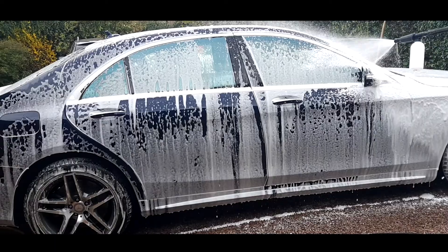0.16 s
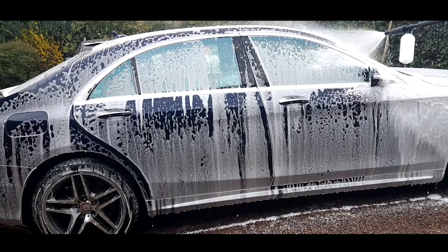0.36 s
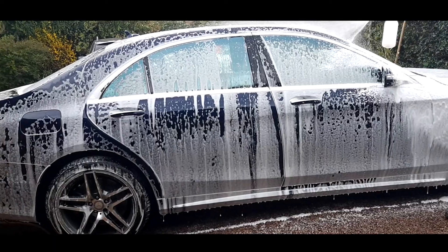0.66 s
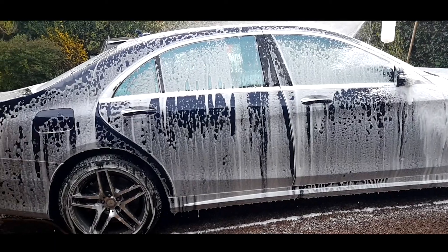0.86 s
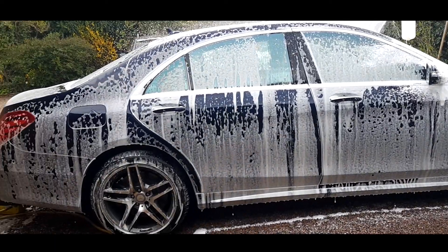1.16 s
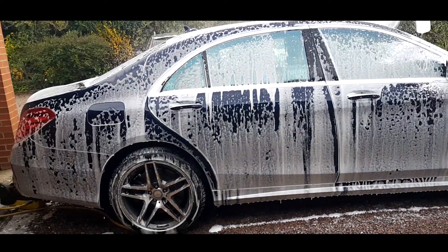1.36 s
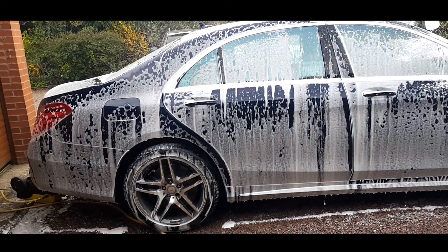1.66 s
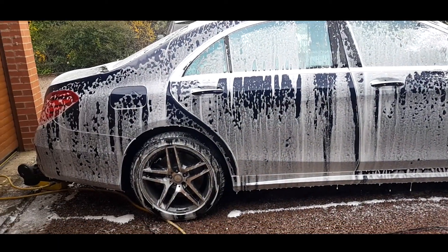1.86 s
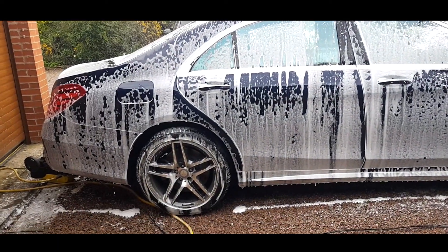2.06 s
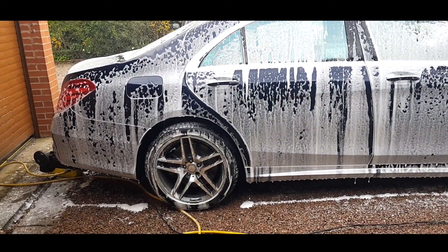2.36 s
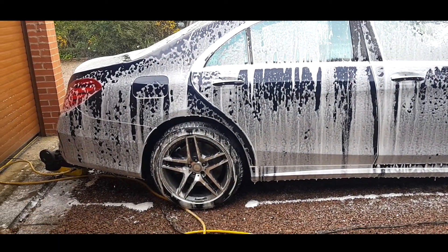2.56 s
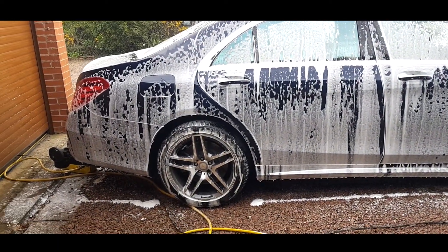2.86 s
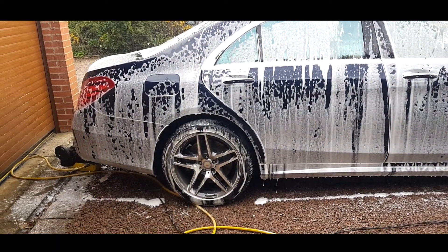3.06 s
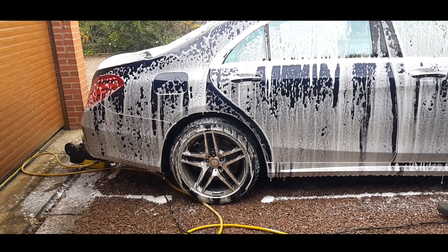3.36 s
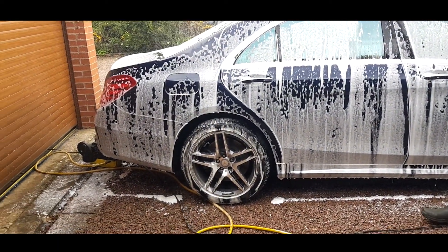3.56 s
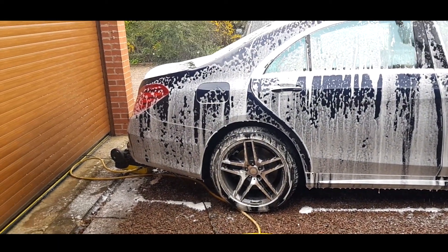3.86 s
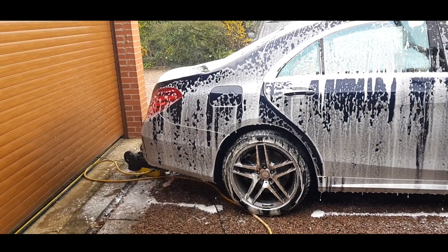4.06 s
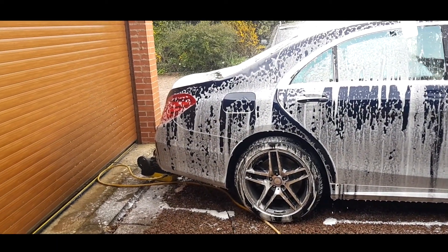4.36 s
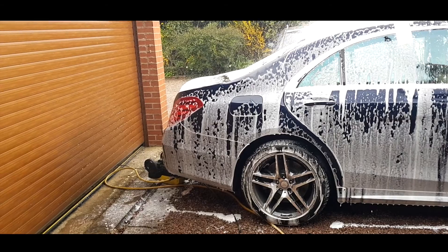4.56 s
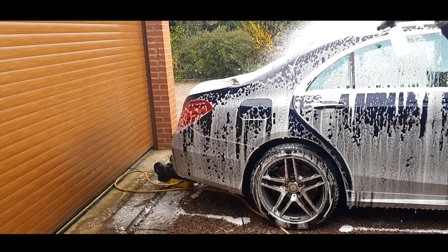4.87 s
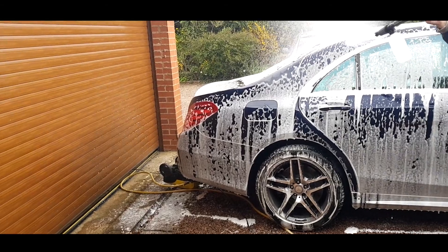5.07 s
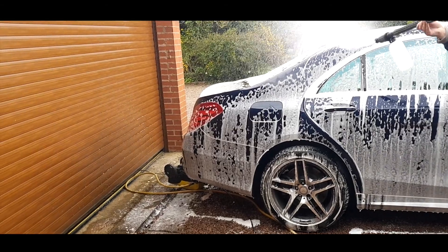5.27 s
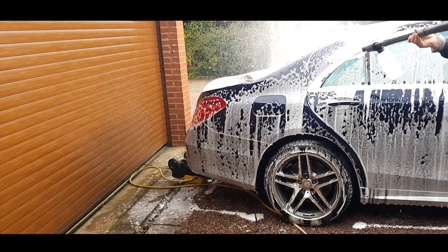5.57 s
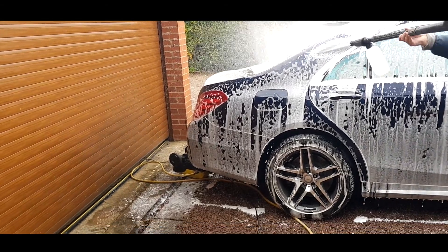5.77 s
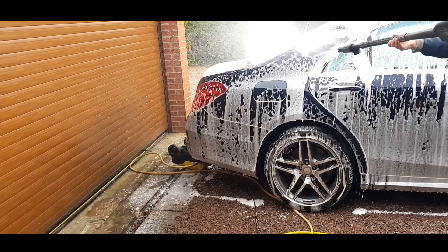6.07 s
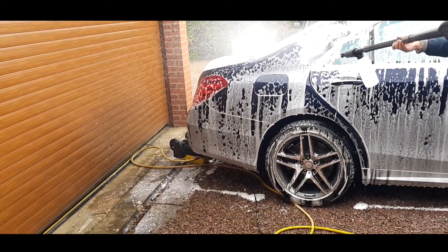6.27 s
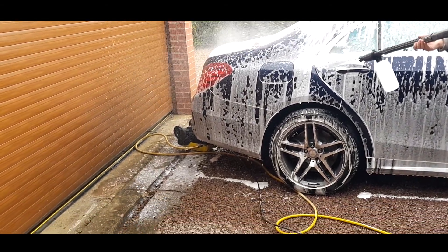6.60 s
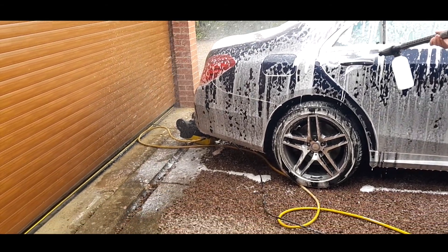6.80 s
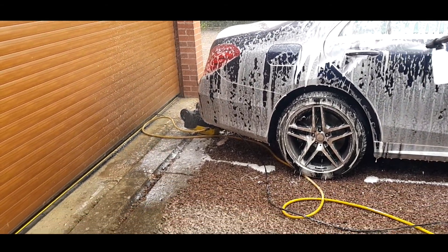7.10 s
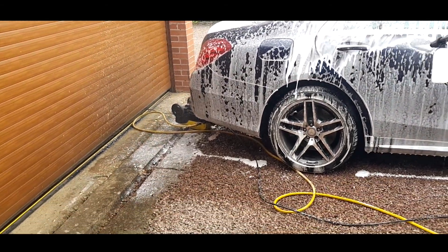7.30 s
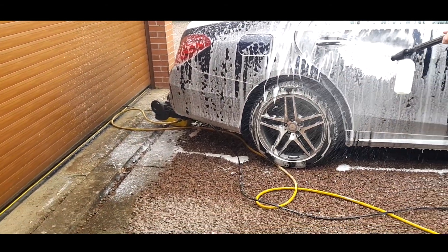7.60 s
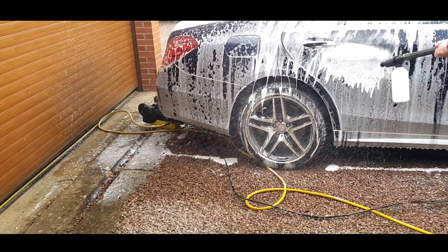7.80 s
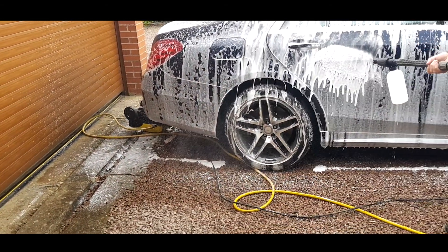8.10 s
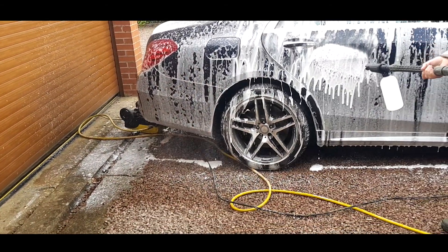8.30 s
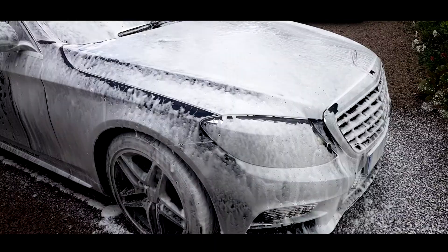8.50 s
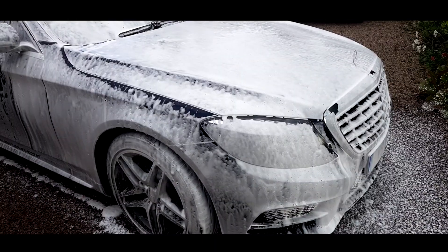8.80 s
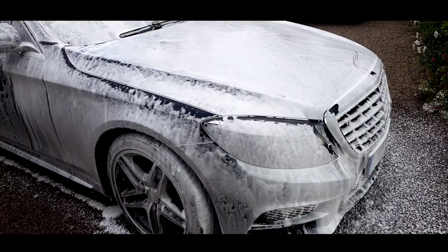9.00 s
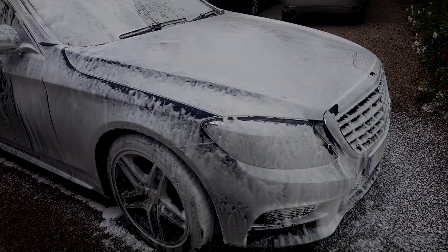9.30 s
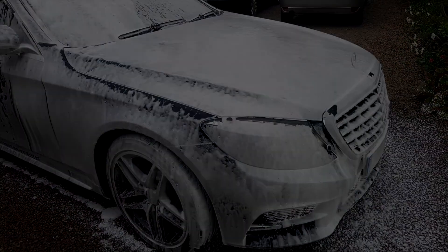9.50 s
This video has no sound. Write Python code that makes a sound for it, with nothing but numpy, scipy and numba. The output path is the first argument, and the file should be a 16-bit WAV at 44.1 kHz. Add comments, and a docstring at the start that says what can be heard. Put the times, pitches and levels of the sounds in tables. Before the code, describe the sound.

A clipped burst of pump buzz and clatter, then brief silence. A pressure washer fades in, its electric hum under a rushing jet, wind thumping the microphone. The hiss grows bright and close, foam pattering on panels, until the trigger snaps, the motor runs down and small knocks follow. Silence, then faint outdoor air.

```python
"""On a driveway, a pressure washer foams a car: orders of the shaft speed hum as the pump, filtered noise roars
and hisses as the lance and its spray, random impacts patter as foam on the panels.
The trigger snaps shut, the motor runs down and a few knocks follow, while low noise buffets the microphone as wind.
The sound comes in three stretches with silence between; the last holds only distant outdoor noise, faint chirps,
a short wet rustle and a low drone, besides one quiet tick."""
import sys
import numpy as np
from scipy import signal
from scipy.fft import rfft, irfft, next_fast_len
from scipy.io import wavfile
from scipy.ndimage import uniform_filter1d, map_coordinates
from numba import njit

SR = 44100
rng = np.random.default_rng(int(sys.argv[2]) if len(sys.argv) > 2 else 0)


def bounce(signal):
    """Save signal as a 16-bit WAV file at the path given by the first command-line argument."""
    frames = np.transpose(np.atleast_2d(signal))
    limited = np.clip(frames, -1, 1)
    pcm = np.round(limited * 32767).astype(np.int16)
    wavfile.write(sys.argv[1], SR, pcm)


N = 425565
T = np.arange(N) / SR  # s
TOP_HZ = 15900  # nothing much is heard above this

# Levels in the tables are those before the trims, wavers and pans set in the functions.
# Colours are spectra: their levels shape a sound, whose loudness is set elsewhere.

# Stretches of sound. Each row: start in seconds, end in seconds, fade-in in seconds.
STRETCHES = [(0, .101, .002), (.381, 8.43, .2), (8.785, 9.66, .3)]

# Pump hum, a list for each run. Each row: time in seconds, level in dB.
HUM_LEVEL = [
    [(0, -35.5), (.1, -60)],
    [(.39, -43.5), (.75, -39), (2.2, -37.5), (3.4, -33), (4.5, -34.5), (5.4, -37.5), (6.9, -36.5),
     (7.72, -36)],
]
# Tones of the pump. Each row: multiple of the shaft speed, level in dB.
PUMP_ORDERS = [(3, -16), (4, -22), (5, -12.5), (6, -10), (7, -14.5), (8, -31), (9, -19), (10, -32.5),
               (11, -7), (12, -10), (13, 0), (14, -3), (15, -15), (16, -12), (17, -11.5), (18, -17.5),
               (19, -29), (20, -24.5), (21, -20.5), (22, -25), (23, -17), (24, -12.5), (25, -16),
               (26, -13.5), (27, -18.5)]
# Steady tones in the hum that do not follow the shaft. Each row: pitch in Hz, level in dB.
MAINS_TONES = [(199.3, -17.5), (600, -19.5)]
# Low pump tones, mostly fading as the microphone moves round the car. Each row: time in seconds, gain in dB.
BOOM_GAIN = [(0, 9.5), (.6, 4), (1.3, 4.5), (2.2, -1.5), (3.3, 0), (4.3, -2.5), (5.3, -1), (6.5, -5),
             (7.6, -2)]
# Colour of the rattling pump housing. Each row: frequency in Hz, level in dB.
HOUSING_COLOUR = [(100, -22), (180, -13), (320, -7.5), (410, -18), (510, 0.5), (620, 0), (760, -9),
                  (1000, -17.5), (1300, -13.5), (2500, -20.5), (5000, -32.5)]
# Shaft speed in the long stretch, and in the short first one
SHAFT_HZ, FIRST_SHAFT_HZ = 48.17, 49.8
# The trigger shuts, the loaded motor sags, then it is cut and runs down
SHUT_S, CUT_OUT_S = 7.640, 7.724
STALL_SAG_HZ, STALL_S, RUN_DOWN_HZ_PER_S = 0.82, .03, 32

# Broad rush of the jet, a list for each run. Each row: time in seconds, level in dB.
RUSH_LEVEL = [
    [(0, -46.5), (.1, -52)],
    [(.39, -34), (.8, -31.5), (1.2, -34), (2.6, -32.5), (3.3, -29.5), (4.7, -32), (5, -33), (6.1, -32),
     (7.6, -31)],
]
# Lower resonance of the roar, a list for each run. Each row: time in seconds, level in dB.
LOW_ROAR_LEVEL = [
    [(0, -58.5), (.1, -53)],
    [(.39, -47), (.85, -31), (1.1, -40.5), (1.7, -35), (2.4, -39.5), (2.81, -29.5), (3.4, -29), (3.83, -33),
     (4.75, -27.5), (5.0, -35.5), (5.2, -31.5), (6.1, -30), (6.3, -43.5), (6.6, -31), (6.96, -35),
     (7.63, -40.5)],
]
# Upper resonance of the roar, a list for each run. Each row: time in seconds, level in dB.
HIGH_ROAR_LEVEL = [
    [(0, -44.5), (.1, -57)],
    [(.39, -39), (.65, -33.5), (.9, -39), (1.3, -38), (2.2, -46), (2.6, -37.5), (3.5, -33), (4, -31),
     (4.8, -28), (5.1, -31.5), (5.5, -28), (6.1, -29.5), (6.4, -27), (6.8, -34.5), (7.4, -32), (7.63, -44)],
]
# Resonances as the lance is swung. Each row: time in seconds, lower centre in Hz, upper centre in Hz.
LANCE_AIM = [(.42, 1898, 1904), (.62, 1800, 2155), (.85, 1560, 1980), (1.3, 1650, 2130), (1.75, 1502, 2083),
             (2.3, 1700, 2220), (2.85, 1876, 2410), (3.3, 1710, 2350), (4.3, 1787, 2360),
             (4.85, 1870, 2458), (5.15, 1806, 2390), (5.55, 1770, 2440), (6.1, 1860, 2290),
             (6.45, 1780, 2370), (6.9, 1760, 2330), (7.6, 1800, 2405)]
# Colour of the broad rush. Each row: frequency in Hz, level in dB.
RUSH_COLOUR = [(500, -16), (800, -7), (1000, -7.5), (1250, -0.5), (1420, -4), (1650, 1), (2100, 1.5),
               (2700, -2.5), (3000, -9.5), (4000, -14.5), (6000, -31.5)]
# The nozzle whistles as it points past the microphone. Each row: middle in seconds, length in seconds, level in dB.
WHISTLES = [(5.18, 0.52, -27.5), (5.6, 0.27, -27.5), (6.05, 0.26, -39), (6.8, 0.59, -29),
            (7.18, 0.4, -24.5), (7.38, 0.13, -27)]
# Pitch of the whistle. Each row: time in seconds, centre in Hz.
WHISTLE_PITCH = [(5.1, 3230), (5.55, 3380), (6.1, 3300), (6.8, 3240), (7.4, 3330)]

# Hiss of the spray, a list for each run. Each row: time in seconds, level in dB.
HISS_LEVEL = [
    [(0, -43), (.02, -45), (.035, -55.5), (.06, -50), (.075, -46), (.1, -62)],
    [(.39, -44.5), (.65, -44), (1.24, -43.5), (2.15, -46.5), (2.8, -36.5), (3.68, -33), (3.78, -29.5),
     (3.88, -28.5), (4.02, -27), (4.13, -27), (4.5, -26.5), (4.78, -25.5), (4.88, -22.5), (5.06, -22.5),
     (5.19, -23.5), (5.25, -26), (5.33, -24), (5.39, -22.5), (5.48, -21.5), (5.56, -29), (5.67, -24.5),
     (5.76, -29), (5.94, -29), (6.0, -30), (6.12, -30.5), (6.22, -25.5), (6.35, -30.5), (6.45, -29.5),
     (6.58, -28), (6.8, -25.5), (7.0, -26), (7.29, -26), (7.4, -21.5), (7.56, -33.5), (7.64, -30)],
]
# Hiss from close by. Each row: frequency in Hz, level in dB.
NEAR_HISS_COLOUR = [(1500, -19), (2800, -3.5), (3950, -1.5), (4500, -20), (5200, -7), (6200, 1.5),
                    (6900, -1.5), (8000, 5.5), (9000, -4), (10200, -0.5), (11200, -7.5), (12600, -5.5),
                    (14000, -12), (16000, -17.5)]
# Hiss from the far end of the car. Each row: frequency in Hz, level in dB.
FAR_HISS_COLOUR = [(1500, -23), (3000, 0.5), (3750, -13.5), (4300, 1), (4750, -2), (5350, 4.5), (6100, -4),
                   (7200, -2.5), (8000, 3.5), (9000, 0), (10300, 0), (11300, -2), (12500, 4), (15500, -6.5)]
# The fan clears the roof and comes into view. Each row: time in seconds, share heard from close by (0 to 1).
IN_VIEW = [(3.66, 0), (3.76, .6), (4.8, 1)]
# Top of the hiss against the rest as the fan changes its angle. Each row: time in seconds, gain in dB.
TOP_HISS_GAIN = [(.5, -4), (2.2, -14), (3.0, -2), (4.2, -1), (4.9, -2.5), (5.45, 0), (5.7, 6.5), (6.4, 2),
                 (7.15, -6), (7.4, -1), (7.55, 11.5)]

# Steady breeze on the microphone. Each row: time in seconds, level in dB.
BREEZE_LEVEL = [(0, -44.5), (1.0, -45), (1.7, -39.5), (3.4, -38), (4.2, -44.5), (5.1, -52), (6, -47.5),
                (7.5, -44), (7.85, -51.5), (8.42, -62.5)]
# Gusts thumping the microphone. Each row: middle in seconds, length in seconds, level in dB before length scaling.
GUSTS = [(0.572, 0.062, -24.5), (0.643, .05, -27), (0.722, 0.19, -33), (1.187, .04, -34), (1.26, 0.11, -36),
         (1.496, 0.03, -25), (1.62, 0.04, -33), (1.69, 0.018, -28), (1.764, 0.078, -28),
         (1.844, 0.045, -29), (1.901, 0.046, -31), (2.078, 0.045, -31), (2.145, 0.044, -32),
         (2.208, .05, -28), (2.267, .03, -36), (2.331, 0.024, -29), (2.382, 0.037, -28), (2.51, 0.25, -28),
         (2.64, .05, -30), (2.721, .035, -24), (2.884, 0.048, -31), (2.963, 0.027, -34),
         (3.167, 0.063, -36), (3.273, 0.043, -33), (3.346, .05, -29.5), (3.625, 0.044, -37),
         (3.857, 0.05, -31), (3.95, .05, -37), (4.035, 0.061, -30), (4.455, 0.033, -34.5),
         (4.629, 0.085, -34.5), (4.8, 0.17, -33), (5.38, 0.087, -42), (6.269, 0.067, -33),
         (6.337, .05, -31), (6.435, 0.073, -31), (6.61, .04, -37), (6.773, 0.052, -32.5),
         (7.17, 0.047, -35), (7.251, 0.044, -34), (7.419, .04, -39.5), (7.528, 0.035, -37),
         (7.763, 0.033, -39), (7.851, .02, -48), (7.907, 0.033, -45), (7.975, 0.035, -44.5),
         (7.999, 0.021, -41), (8.056, .025, -47), (8.152, 0.037, -43), (8.201, 0.029, -35),
         (8.277, 0.037, -42), (8.322, 0.032, -47)]
# Colour of the wind at the microphone. Each row: frequency in Hz, level in dB.
WIND_COLOUR = [(15, -30.5), (35, -4.5), (62, 3), (100, -1), (150, -10), (220, -18), (400, -31), (1200, -64),
               (16000, -140)]

# Distant outdoor noise, a list for each stretch. Each row: time in seconds, level in dB.
AIR_LEVEL = [
    [(0, -37.5), (.1, -59)],
    [(.39, -45.5), (7.8, -65), (8.2, -70), (8.43, -77)],
    [(8.79, -54), (9.2, -49), (9.65, -55.5)],
]
# Colour of the distant noise. Each row: frequency in Hz, level in dB.
AIR_COLOUR = [(25, -16.5), (55, -4), (110, -5), (150, -10), (270, -10), (380, -14.5), (700, -16),
              (1200, -15), (1700, -20.5), (2500, -24.5), (3500, -30.5), (5200, -37.5), (7500, -35),
              (15500, -51)]

# Knocks and ticks. Each row: start in seconds, level in dB, time to fall 60 dB in seconds,
# tilt in dB per octave, ring in Hz.
KNOCKS = [(.012, -29.5, 0.12, -3, 600), (.031, -32, 0.05, -3, 2350), (0.042, -30, 0.18, -8, 189),
          (.066, -43, .04, -2, 2000), (.086, -35, 0.036, -2, 1910), (.655, -33.5, 0.18, -0.5, 800),
          (1.695, -29.5, 0.21, -1, 590), (4.233, -41, 0.11, -6, 600), (4.659, -23, .1, 2, 700),
          (4.752, -11, .012, 3, 2510), (7.811, -50, 0.063, 3, 1500), (7.862, -47, 0.087, -1, 2600),
          (7.872, -42.5, .11, -3.5, 600), (7.973, -58, .05, -4, 2400), (8.03, -62, .05, -3, 1100),
          (8.054, -61, .04, -3, 2800), (8.071, -54, .03, 0, 1000), (8.102, -54, 0.054, -4, 900),
          (8.133, -49, 0.046, -8, 840), (8.17, -63, .04, -3, 3000), (8.206, -50, .045, 3, 2090),
          (8.237, -54, 0.043, -8, 1800), (8.253, -35.5, 0.035, 1, 680), (8.263, -53, 0.066, 0, 650),
          (8.28, -56, .04, 2, 600), (8.418, -52.5, 0.014, 2.5, 2400), (8.839, -41.5, .03, -1.5, 2500)]
# Colour of their clatter before the tilt. Each row: frequency in Hz, level in dB.
KNOCK_COLOUR = [(100, -15.5), (250, 1.5), (800, 0), (1400, -12), (2500, -6.5), (5000, -25.5), (8500, -6.5),
                (15000, -21.5)]
# Big drops on glass and paint. Each row: start in seconds, level in dB.
SPITS = [(.068, -42), (3.766, -16), (3.989, -13.5), (4.851, -8), (4.986, -15), (4.992, -15), (5.075, -12),
         (5.085, -15.5), (5.215, -8), (5.383, -6), (5.415, -12), (5.496, -21), (6.103, -27), (7.447, -17)]
# Dull footfalls. Each row: start in seconds, level in dB, ring in Hz.
THUDS = [(1.268, -31, 192), (1.695, -38, 208), (2.471, -26, 179), (2.521, -29, 213), (4.235, -39, 345),
         (4.658, -29, 288), (4.678, -28, 330), (4.775, -31, 150)]

# Foam splashing on the near panels. Each row: time in seconds, level in dB.
SPLASH_LEVEL = [(3.6, -55), (3.74, -36), (4.3, -32.5), (4.85, -29), (5.3, -36), (5.65, -28), (6.1, -28),
                (6.3, -28.5), (6.55, -31), (6.8, -29.5), (7.15, -28.5), (7.42, -28.5), (7.53, -45),
                (7.63, -32)]
# Colour of the splashing. Each row: frequency in Hz, level in dB.
SPLASH_COLOUR = [(1900, -23.5), (2550, -0.5), (2800, 0), (3080, -1), (3380, 1), (3700, -8.5), (3950, 0),
                 (4200, -8), (4450, -6), (4750, -5), (6500, -23)]

# Modes of the trigger valve. Each row: pitch in Hz, level in dB, time to fall 60 dB in seconds.
VALVE_MODES = [(1136, -3.5, 0.081), (1350, -0.5, 0.034), (1413, -3.5, 0.062), (1760, 3, 0.038),
               (1810, -5.5, 0.029), (1960, 1.5, 0.061), (2640, -1.5, 0.035), (3760, 3, 0.032),
               (3900, 4.5, 0.016), (4130, 3, 0.04), (8200, 11, 0.012), (10230, -2, .012)]
# Crack of the valve. Each row: frequency in Hz, level in dB.
CRACK_COLOUR = [(200, -12), (500, -9), (1000, -2), (1700, -1), (2800, 0.5), (3900, 3), (5200, -18.5),
                (6500, -18.5), (8200, -4), (11000, -6.5), (15500, -13)]

# Scuffs on the wet ground. Each row: middle in seconds, length in seconds, level in dB.
SCUFFS = [(8.055, 0.062, -56), (8.115, 0.093, -63), (8.23, 0.14, -61.5)]
# Colour of the scuffs. Each row: frequency in Hz, level in dB.
SCUFF_COLOUR = [(250, -17), (550, 2), (950, 0), (1400, -19), (2300, -13), (4500, -19), (8000, -17),
                (15000, -16)]
# Faint chirps. Each row: middle in seconds, length in seconds, level in dB, pitch at the middle in Hz,
# glide in Hz per second.
CHIRPS = [(9.034, 0.066, -56, 2610, 0), (9.252, 0.034, -59, 2170, -9000), (9.49, .1, -72, 2970, -5000)]
# Wet rustles. Each row: middle in seconds, length in seconds, level in dB.
RUSTLES = [(9.078, 0.034, -50), (9.14, 0.13, -49.5), (9.25, 0.048, -55), (9.31, 0.094, -54.5)]
# Low drone at the very end. Each row: pitch in Hz, level in dB.
DRONE_TONES = [(108.5, -50), (222, -56), (276, -69)]


def undb(db):
    """Decibels to gain."""
    return 10 ** (np.asarray(db) / 20)


def unit(x):
    """Scale to rms 1."""
    return x / np.sqrt(np.mean(x ** 2))


def decay(t, t60):
    """Exponential fall of 60 dB in t60 seconds."""
    return np.exp(-np.log(1000) * t / t60)


def curve(rows, column=1):
    """One column of a table, joined by straight lines in time."""
    rows = np.array(rows)
    return np.interp(T, rows[:, 0], rows[:, column])


def swell(runs, t60=0.064):
    """Gain from the levels of several runs; each run dies away after its last row."""
    gain = 0
    for rows in runs:
        after = np.clip((T - rows[-1][0]) / t60, 0, 2)
        gain = gain + (T >= rows[0][0]) * undb(curve(rows)) * decay(after, 1)
    return gain


def bumps(rows):
    """Gain of separate sounds, each rising and falling smoothly about its middle."""
    gain = 0
    for middle_s, length_s, db in rows:
        gain = gain + undb(db) * np.cos(np.pi * np.clip((T - middle_s) / length_s, -.5, .5))
    return gain


def colour(x, points, tilt_db=0):
    """Filter by a (Hz, dB) spectrum and a tilt per octave; rms 1."""
    hz, db = np.transpose(points)
    size = next_fast_len(x.shape[-1], True)
    octave = np.log2(np.maximum(np.arange(size // 2 + 1) * SR / size, 1))
    tilt = tilt_db * np.clip(octave, np.log2(hz[0]), None)
    gain = undb(np.interp(octave, np.log2(hz), db) + tilt)
    return unit(irfft(rfft(x, size) * gain, size)[..., :x.shape[-1]])


def noise(likeness=0., size=N):
    """Stereo noise with a given left-right correlation."""
    mid, side = rng.standard_normal((2, size))
    c = np.clip(likeness, -1, 1)
    return (np.sqrt(1 + c) * mid + np.sqrt(1 - c) * np.array([side, -side])) / np.sqrt(2)


def drops(rate, spread_db):
    """Random impacts, rate per second in each channel, most tiny and a few large; rms 1."""
    size = undb(spread_db * np.minimum(rng.standard_exponential((2, N)), 5))
    hits = rng.random((2, N)) < rate / SR
    return unit(hits * size * rng.choice([-1, 1], (2, N)))


def pan(db):
    """Left and right gains for a level difference."""
    return undb(np.array([[.5], [-.5]]) * db)


def walk(rate):
    """Random levels, rate per second, joined by straight slews."""
    k = max(int(SR / rate), 1)
    steps = np.repeat(rng.standard_normal(N // k + 2), k)
    return unit(uniform_filter1d(steps, k)[:N])


@njit
def svf(x, hz, width):
    """State-variable band-pass with a moving centre."""
    y, b, l = np.empty(len(x)), 0., 0.
    for i in range(len(x)):
        g, k = np.tan(np.pi * hz[i] / SR), width / hz[i]
        v = (b + g * (x[i] - l)) / (1 + g * (g + k))
        b, l, y[i] = 2 * v - b, l + 2 * g * v, k * v
    return y


def shaft_speed():
    """Steady while spraying; sags when the valve shuts, and runs down once the motor is cut."""
    steady = np.where(T < STRETCHES[1][0], FIRST_SHAFT_HZ, SHAFT_HZ)
    sag = STALL_SAG_HZ * np.clip((T - SHUT_S) / STALL_S, 0, 1)
    run_down = RUN_DOWN_HZ_PER_S * np.maximum(T - CUT_OUT_S, 0)
    return np.maximum(steady - sag - run_down, 0)


def pump(tone_db=-0.6, rattle_db=-4.5, smear_rad=.59, waver_db=0.94, shake_rad=0.15, throb=0.13,
         pan_db=2.0, port_phase_rad=1.0, stop_t60=0.22,
         strain_db=-33, strain_db_per_s=150, strain_t60=0.11):
    """Each turn of the shaft kicks the pump, whose housing hums at multiples of the speed and rattles."""
    turn = 2 * np.pi * np.cumsum(shaft_speed() * (1 + 0.00061 * walk(14))) / SR
    tones, boom_db = np.zeros((2, N)), curve(BOOM_GAIN)
    for order, db in PUMP_ORDERS:
        # the housing delays each partial differently, which smears the kick over the turn
        phase = order * turn + smear_rad * (order - 13) ** 2
        lag = port_phase_rad * order / 13 * np.array([[.5], [-.5]])
        low = order < 8
        gain = undb(db + low * boom_db + waver_db * walk(6)) * pan(0 if low else pan_db)
        tones += np.sqrt(2) * gain * np.cos(phase + lag + shake_rad * walk(30))
    for hz, db in MAINS_TONES:
        tones += np.sqrt(2) * undb(db) * np.cos(2 * np.pi * hz * T + shake_rad * walk(11.0))
    rattle = colour(noise(0.41) * (1 + throb * np.cos(turn)), HOUSING_COLOUR) * pan(2.4)
    hum = (undb(tone_db) * tones + undb(rattle_db) * rattle) * swell(HUM_LEVEL, t60=stop_t60)
    # pressure builds behind the shut valve and the housing rings ever louder, until the motor is cut
    start_db = strain_db - strain_db_per_s * (CUT_OUT_S - SHUT_S)
    pressure = swell([[(SHUT_S, start_db), (CUT_OUT_S, strain_db)]], t60=strain_t60)
    strain = np.sqrt(2) * np.cos(13 * turn) * pressure * pan(pan_db)
    return hum + strain


def resonance(hz, width_hz, wander, sputter_db):
    """Turbulence rings one resonance of the jet, which shifts and sputters as air and soap mix."""
    centre = hz * (1 + wander * walk(7))
    ears = []
    for ear in noise(0.38):
        once = svf(ear, centre, float(width_hz))
        ears.append(svf(once, centre, float(width_hz)))
    return unit(np.array(ears)) * undb(sputter_db * walk(45))


def reflections(x, lags_s, share, drift_s=0.00025, port_s=.00025):
    """Panels, door and ground return the jet a little late; drifting paths ripple its spectrum."""
    ears = []
    for ear in x:
        # the lengths drift as the lance moves, the direct path included
        paths = [port_s * walk(0.99)] + [lag + drift_s * walk(1.2) for lag in lags_s]
        direct, *echoes = (map_coordinates(ear, [(T - path) * SR], order=3) for path in paths)
        ears.append(direct + share * sum(echoes))
    return np.array(ears) / np.sqrt(1 + len(lags_s) * share ** 2)


def lance(body_db=-1.73, whistle_db=-2, low_wander=0.028, high_wander=0.012,
          low_width_hz=420, high_width_hz=340, whistle_width_hz=210, pan_db=2.5):
    """The jet rushes through two broad resonances that shift with its swing, and a narrow, fitful whistle."""
    rush = colour(noise(0.65) + 0.41 * drops(4000, 0.86), RUSH_COLOUR)
    rush = rush * undb(body_db + 1.7 * walk(35))
    low = resonance(curve(LANCE_AIM, column=1), low_width_hz, low_wander, 1.1)
    high = resonance(curve(LANCE_AIM, column=2), high_width_hz, high_wander, 2.1)
    whistle = undb(whistle_db) * resonance(curve(WHISTLE_PITCH), whistle_width_hz, .009, 2.6)
    roar = rush * swell(RUSH_LEVEL, t60=0.5)
    roar = roar + low * swell(LOW_ROAR_LEVEL, t60=0.16)
    roar = roar + high * swell(HIGH_ROAR_LEVEL, t60=0.17)
    roar = roar + whistle * bumps(WHISTLES)
    return reflections(roar, [.0032, .0071, .0125], share=.33, port_s=.00007) * pan(pan_db)


def spray(hiss_db=1.29, patter=0.55, flutter_db=1.28, sputter_db=1.0, sway_db=0.3,
          fizz_db=19, fizz_hz=9400, sing_db=-15.5, sing_hz=8100, sing_width_hz=1100, sing_wander=.02,
          settle_db=-60, settle_t60=4.3, pan_db=0.34):
    """The fan of foam hisses and patters on the panels, swaying with the hand; later the last flecks settle."""
    fan = noise(.8) + patter * drops(3500, 4.3)
    fan = fan * undb(flutter_db * walk(40) + sputter_db * walk(400))
    near = curve(IN_VIEW)
    force = swell(HISS_LEVEL, t60=0.22) * undb(sway_db * walk(10))
    hiss = near * colour(fan, NEAR_HISS_COLOUR) + (1 - near) * colour(fan, FAR_HISS_COLOUR)
    top = signal.sosfiltfilt(signal.butter(3, 11000, "high", fs=SR, output="sos"), hiss)
    hiss = hiss + top * (undb(curve(TOP_HISS_GAIN)) - 1)
    # where the fan hits hardest, a bright fizz grows faster than the hiss
    fizz = resonance(fizz_hz, 4000, 0, .5) * force ** 2
    # the sharpest part of the hiss shifts a little in pitch
    sing = resonance(sing_hz, sing_width_hz, sing_wander, 1.2) * near
    sound = (undb(hiss_db) * hiss + undb(sing_db) * sing) * force + undb(fizz_db) * fizz
    heard = reflections(sound, [.0009, .0023, .0052], share=.45, drift_s=.00009, port_s=.00006)
    flecks = colour(drops(700, 2.6), NEAR_HISS_COLOUR, tilt_db=-1.0)
    return heard * pan(pan_db) + flecks * swell([[(SHUT_S, settle_db)]], t60=settle_t60)


def wind(wind_db=-2.0, eddy_db=3, lull_db=3.5, flutter_db=-8, flutters_per_s=22, flutter_tilt_db=3):
    """A breeze whose eddies buffet each microphone port separately."""
    flow = swell([BREEZE_LEVEL]) * undb(lull_db * walk(18))
    strength_db = eddy_db * np.array([walk(30), walk(30)]) - eddy_db / 2
    eddies = undb(strength_db) * colour(noise(), WIND_COLOUR)
    flutter = colour(drops(flutters_per_s, 2.2), WIND_COLOUR, tilt_db=flutter_tilt_db)
    return flow * (undb(wind_db) * eddies + undb(flutter_db) * flutter)


def outdoor_air(air_db=3, wide_hz=800):
    """Distant rumble from coloured noise, alike in both ears in the bass and wider above."""
    mid, side = colour(noise(), AIR_COLOUR)
    side = signal.sosfilt(signal.butter(1, wide_hz, "high", fs=SR, output="sos"), side)
    air = np.array([mid + side, mid - side])
    return air * undb(air_db + 0.69 * walk(12)) * swell(AIR_LEVEL)


def knocks(ring_db=-6.0, mode_db=-3, mode_damping=2.2, upper_ratio=1.57, body_db=-2, clatter=0.93):
    """Each struck thing rings at its own pitch, well damped, and clatters with small after-contacts."""
    out, t = np.zeros((2, N)), T[:SR // 2]
    contacts = drops(400, 1.2)[0]
    for s, db, t60, tilt_db, hz in KNOCKS:
        start = int(s * SR)
        place = slice(start, start + len(t))
        fall = decay(t, t60)
        body = noise(0.29, size=len(t)) + clatter * contacts[place]
        body = colour(body, KNOCK_COLOUR, tilt_db)
        peak = [(hz / 3, -45), (hz / 1.4, -11), (hz, 0), (hz * 1.4, -11), (hz * 3, -45)]
        ring = colour(noise(0.89, size=len(t)), peak)
        modes = np.sin(2 * np.pi * hz * t) + np.sin(2 * np.pi * upper_ratio * hz * t) / 2
        knock = fall * (undb(body_db) * body + undb(ring_db) * ring)
        knock = knock + undb(mode_db) * modes * fall ** mode_damping
        out[:, place] += undb(db) * knock
    return out * pan(2.2)


def spits(t60=0.0039, tilt_db=1):
    """Big drops crack against glass and paint: very short bursts of noise."""
    out, t = np.zeros((2, N)), T[:SR // 20]
    for s, db in SPITS:
        start = int(s * SR)
        burst = colour(noise(0.39, size=len(t)), NEAR_HISS_COLOUR, tilt_db)
        out[:, start:start + len(t)] += undb(db) * decay(t, t60) * burst
    return out


def buffets(gust_db=-1, likeness=-0.077, longer_tilt_db=22):
    """Each gust is one short thump of pressure; the longer ones reach higher in pitch."""
    out, t = np.zeros((2, N)), T[:SR // 2] - 1 / 4
    for s, length, db in GUSTS:
        push = noise(likeness, size=len(t)) * np.cos(np.pi * np.clip(t / length, -.5, .5))
        thump = colour(push, WIND_COLOUR, longer_tilt_db * length)
        start = int((s + t[0]) * SR)
        out[:, start:start + len(t)] += undb(gust_db + db) * np.sqrt(length) * thump
    return out


def thuds(rise_s=0.0048, upper_ratio=2.2, upper_db=-9):
    """Each footfall swells and soon dies: a low ring and a weaker, shorter one above it."""
    out = 0
    for s, db, hz in THUDS:
        age = np.maximum(T - s, 0)
        push = age / rise_s * np.exp(1 - age / rise_s)
        turn = 2 * np.pi * hz * age
        out = out + undb(db) * push * (np.sin(turn) + undb(upper_db) * push * np.sin(upper_ratio * turn))
    return out


def splash(patter=.55, flutter_db=3.0, pan_db=0.7):
    """Once the fan clears the roof, clots of foam slap the near glass and paint in a dense, uneven patter."""
    slaps = (noise(.4) + patter * drops(1500, 3.0)) * undb(flutter_db * walk(55))
    heard = reflections(colour(slaps, SPLASH_COLOUR), [.0041, .0093], share=.35)
    return heard * swell([SPLASH_LEVEL], t60=0.18) * pan(pan_db)


def trigger(ring_db=-19, crack_db=-17, crack_t60=0.027, echo_db=-27, echo_t60=0.13,
            attack_s=0.0011, ring_rise_cycles=2.5):
    """The valve slams shut: a crack, the lance ringing, and a short noisy tail as echo from car and wall."""
    t = T[:SR // 2]
    ring = 0
    for hz, db, t60 in VALVE_MODES:
        # counted in cycles, so the low modes build last
        rise = np.minimum(t * hz / ring_rise_cycles, 1)
        cycles = hz * t + rng.random() + rng.random((2, 1)) / 4
        ring = ring + undb(db) * decay(t, t60) * rise * np.sin(2 * np.pi * cycles)
    fall = undb(crack_db) * decay(t, crack_t60) + undb(echo_db) * decay(t, echo_t60)
    crack = fall * colour(noise(.2, size=len(t)), CRACK_COLOUR)
    snap = (undb(ring_db) * ring + crack) * np.minimum(t / attack_s, 1)
    start = int(SHUT_S * SR)
    return np.pad(snap, ((0, 0), (start, N - start - len(t)))) * pan(1.2)


def scuffing():
    """Grit shifts on the wet ground in short runs of small, dull grains."""
    grains = drops(450, 2.6)
    return colour(grains + grains.mean(axis=0), SCUFF_COLOUR) * bumps(SCUFFS) * pan(1.5)


def birds():
    """Faint, far chirps, each a thin tone that holds or glides."""
    out = 0
    for s, length, db, hz, glide in CHIRPS:
        cycles = (hz + glide * (T - s) / 2) * (T - s)
        out = out + np.sin(2 * np.pi * cycles) * bumps([(s, length, db)])
    return out


def rustling():
    """Wet rustles: dense, bright impacts in short swells."""
    return colour(drops(3000, 4), NEAR_HISS_COLOUR, tilt_db=8.0) * bumps(RUSTLES)


def drone(start_s=9.5, rise_s=0.093):
    """A low drone of unsteady tones swells at the very end."""
    tones = 0
    for hz, db in DRONE_TONES:
        tones = tones + np.sqrt(2) * undb(db) * np.sin(2 * np.pi * hz * T + .5 * walk(25))
    return tones * np.clip((T - start_s) / rise_s, 0, 1)


def scene():
    """All sources together."""
    washer = pump() + lance() + spray() + spits() + splash() + trigger()
    handling = knocks() + thuds() + scuffing()
    surroundings = wind() + buffets() + outdoor_air() + birds() + rustling() + drone()
    return washer + handling + surroundings


def record(dry):
    """Each stretch fades in and the gaps are silent; the loudest peaks clip, and the top is cut steeply."""
    running = sum(np.clip((T - start) / fade, 0, 1) * (T < end) for start, end, fade in STRETCHES)
    # 200 samples soften the edges
    clipped = np.clip(dry * uniform_filter1d(running, size=200), -.85, .85)
    return signal.sosfilt(signal.ellip(10, .2, 80, TOP_HZ, fs=SR, output="sos"), clipped)


dry = scene()
out = record(dry)
bounce(out)
```